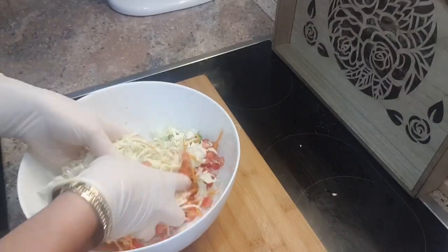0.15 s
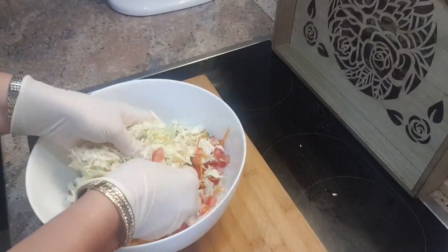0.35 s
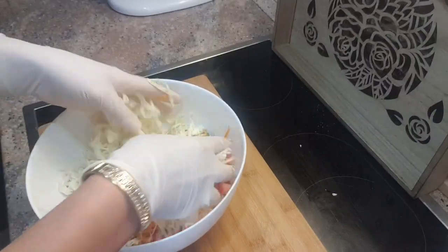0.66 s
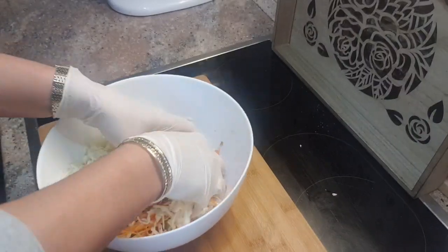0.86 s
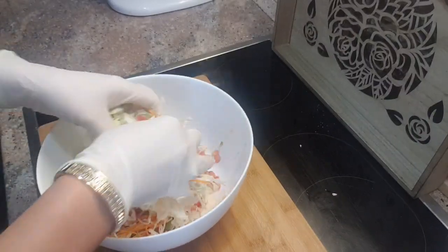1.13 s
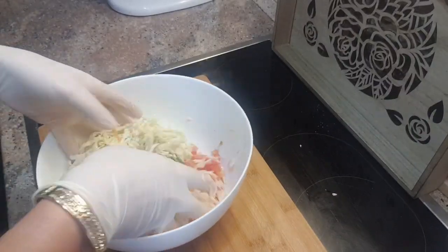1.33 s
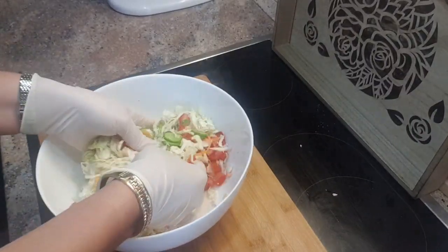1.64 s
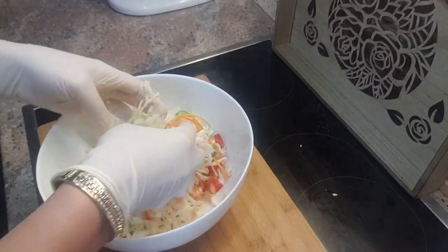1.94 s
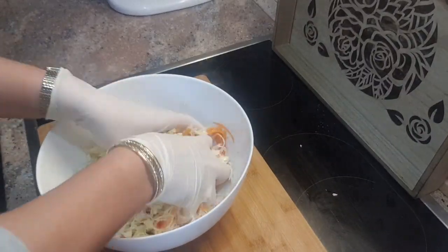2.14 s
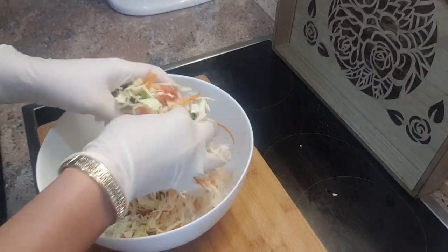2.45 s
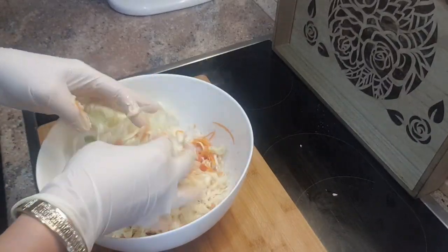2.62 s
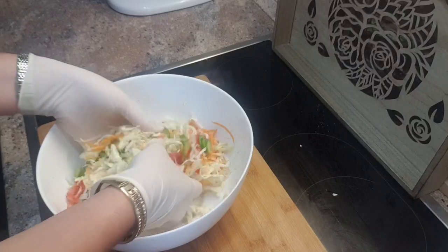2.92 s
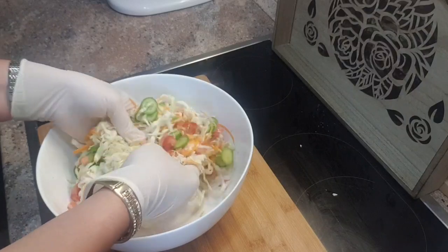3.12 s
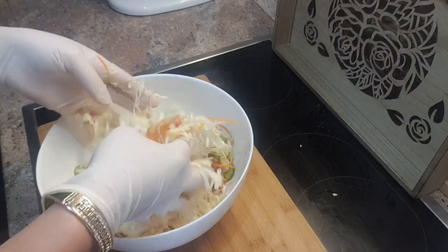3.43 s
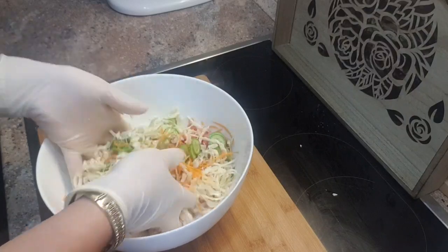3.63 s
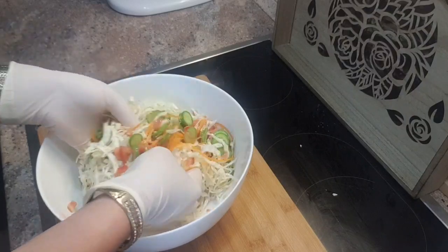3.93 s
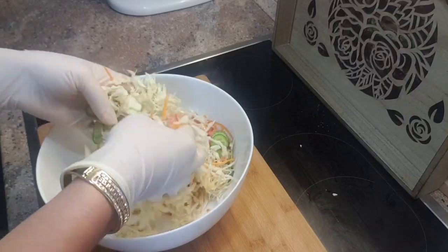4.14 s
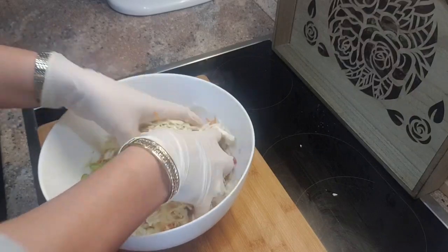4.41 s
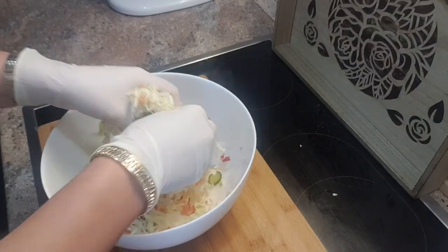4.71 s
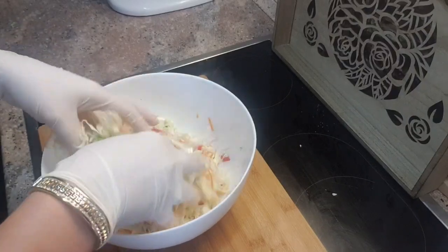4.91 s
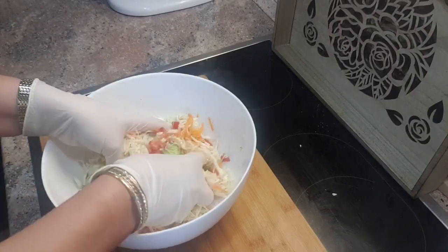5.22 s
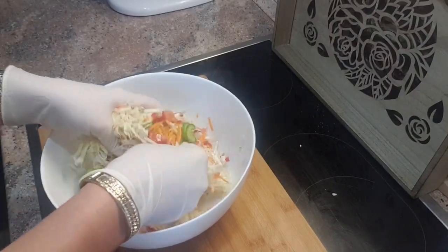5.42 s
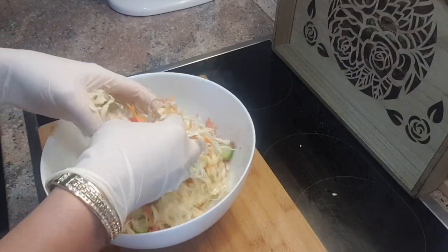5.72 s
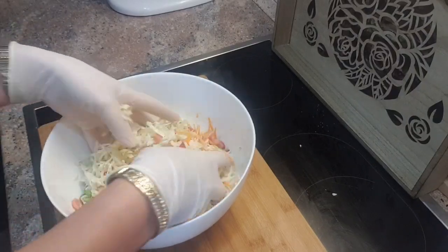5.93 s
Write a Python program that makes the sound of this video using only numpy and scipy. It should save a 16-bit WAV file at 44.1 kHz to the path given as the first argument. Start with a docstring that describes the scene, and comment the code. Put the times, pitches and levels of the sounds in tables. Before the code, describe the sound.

In a small kitchen, close to the microphone, gloved hands toss shredded cabbage in a bowl over a quiet low hum, soft air noise and a thin whirr leaning left. Scoops land near 0.2, 0.9, 1.5, 2.2, 3.0, 3.8, 4.5, 5.2 and 6.1 seconds, each swelling quickly into crisp rustle and wet squelch, then settling into trickling shreds. The bowl rings softly at 0.1 and shreds snap from 0.2 to 0.4. At 0.9 a wet slap comes with a firm board thump and stronger glove rubbing. The 1.5 scoop is the crispest and juiciest. Around 2.8 a bracelet clacks brightly on the rim, followed by crunchy snaps and a low bump near 3.1. A sharp snap marks 3.7; juice squirts around 4.5. Lighter tosses follow, then a faint clack and short rim ring near 6.0 as another scoop begins.

```python
"""Tossing shredded cabbage

Gloved hands toss shredded cabbage in a glass bowl, scoop after scoop, close by in a small kitchen.
Crowds of tiny noise ticks make the crisp rustle, wet squelch and glove rubbing; short noise bursts
make the snaps, squirts, slaps and bracelet. Fading tones make the bowl ring and its board thump.
An appliance hums underneath, made of unsteady tones and filtered noise."""
import sys
import numpy as np
from scipy import signal
from scipy.fft import rfft, irfft, next_fast_len
from scipy.io import wavfile

SR = 44100
rng = np.random.default_rng(int(sys.argv[2]) if len(sys.argv) > 2 else 0)


def dump_mix(stems):
    """Bounce the given channels to the path in sys.argv[1] as a 16-bit WAV at rate SR."""
    frames = np.atleast_2d(stems).T  # one column per channel
    limited = np.clip(frames, -1, 1)  # hard clip at full scale
    pcm = np.round(limited * 32767).astype(np.int16)
    wavfile.write(sys.argv[1], SR, pcm)


N = 267246  # length in samples

# Each scoop swells until the handful lands, is pressed, then settles; levels are before layer trims:
# (landing t/s, swell t/s, pressing t/s, settling t/s,
#  crisp rustle level/dB, wet squeeze level/dB, weight on the bowl level/dB, glove rubbing level/dB)
SCOOPS = [(.228, .095, .23, .25, -53, -57, -42.5, -63), (.903, .095, .15, .21, -59.5, -55, -41, -40.5),
          (1.533, .085, .11, .185, -51, -52.3, -41.5, -52), (2.205, .052, .143, .2, -55, -57, -46.5, -60),
          (2.954, .17, .125, .205, -56, -55.5, -46.5, -60), (3.77, .13, .09, .17, -54.5, -56.7, -46, -58.5),
          (4.538, .11, .07, .19, -59.5, -52, -40, -52.5), (5.225, .115, .15, .2, -59, -61.5, -48, -61),
          (6.055, .11, .1, .2, -62, -59, -43, -56)]
# How a layer follows a scoop; the board and the gloves have a row like these too:
# (lag t/s, rise in the swell level/dB, share of the pressing time held, settling time multiple,
#  fall per doubling of (1 + time / settling time) level/dB, idle level/dB)
CRISP_SHAPE = (.001, 23, .19, 1.25, 20, -90)
WET_SHAPE = (.008, 24, .85, 1.56, 32.5, -82)
# Fingers dig in, or loose shreds trickle down, between scoops: (t/s, crisp rustle level/dB)
STIRS = [(.02, -79), (.5, -70), (.735, -76), (1.11, -70), (1.39, -75), (2.87, -65), (3.17, -70),
         (3.26, -73), (3.63, -66), (4.84, -78)]
# Tone colour of the wet squeeze: (f/Hz, relative level/dB per Hz)
WET_COLOUR = [(200, -39), (400, -0.5), (700, -2), (1050, -4.5), (1600, -2), (2800, 1.5), (4300, 0),
              (6000, -3.5), (10000, -26), (16000, -23.5)]
# Tone colour of the crisp rustle: (f/Hz, relative level/dB per Hz)
CRISP_COLOUR = [(800, -43), (2500, -10), (4500, 0.5), (7000, 0), (10000, 0), (13000, 0), (15500, -10.5)]


def shreds():
    """Dry edges scrape and wet films part; harder handling sets more shreds slipping."""
    *_, crisp_peaks, wet_peaks, _, _ = np.transpose(SCOOPS)
    wet_db = handling(wet_peaks, WET_SHAPE)
    crisp_db = handling(crisp_peaks, CRISP_SHAPE, STIRS)
    slips = 3500 * amp(.4 * (wet_db - wet_db.max())) + 1400  # per second in each crisp band
    jerks_db = 1.03 * wobble(70, np.arange(N) / SR)
    wet_ticks = grains(slips / 2, 312, 8800, size_db=3.0, clump_db=3.5, count=7)
    wet = amp(wet_db + jerks_db - 1.46) * spread(wet_ticks, WET_COLOUR)
    crisp_ticks = grains(slips, 1700, 16900, size_db=1.5, clump_db=2.05, count=6)
    crisp = amp(crisp_db + jerks_db + 1.18) * spread(crisp_ticks, CRISP_COLOUR)
    # a sparser layer of crunchy ticks, about 120 a second, stands out of the rustle
    crunch_ticks = grains(40, 1800, 12000, size_db=1, clump_db=2.5, count=3)
    crunch = amp((wet_db + crisp_db) / 2 - 8.5) * unit(crunch_ticks)
    return wet + crisp + crunch


# Thick shreds snapping: (t/s, level/dB before the shared trim, pitch f/Hz)
SNAPS = [(.229, -39, 8000), (.303, -40, 10000), (.341, -32.5, 6960), (.389, -40.5, 5000),
         (1.384, -53, 9000), (1.571, -36, 7000), (1.713, -37, 3070), (2.193, -37.5, 9500),
         (2.318, -43.5, 2000), (2.977, -31, 8000), (3.076, -34.5, 6900), (3.234, -42, 8060),
         (3.626, -38.5, 10200), (3.743, -28.5, 8500), (4.69, -50, 4500), (4.933, -48.5, 7000)]
# Juice squirting through narrow gaps: (t/s, level/dB before the shared trim, pitch f/Hz)
SQUIRTS = [(1.66, -46, 9700), (3.051, -43.5, 4270), (3.358, -55, 8950), (4.538, -41, 3970),
           (4.586, -41.5, 1430)]
# Wet handfuls slapping down: (t/s, level/dB before the shared trim, pitch f/Hz)
SLAPS = [(.405, -48, 380), (.899, -35.5, 500), (1.555, -48, 600), (2.228, -52, 680), (2.985, -48, 600),
         (3.234, -48.5, 600), (3.743, -46, 620), (4.413, -53.5, 350)]


def snaps(life=1.0, trim_db=-8):
    """A short burst around the pitch of each snap, squirt or slap; narrow, low ones last longest."""
    out, t = np.zeros((2, N)), np.arange(SR // 8) / SR
    # the second number is the relative width of the band of noise
    for events, width in (SNAPS, .57), (SQUIRTS, .095), (SLAPS, .45):
        for s, db, pitch_hz in events:
            band = lambda hz: np.exp(-.5 * (np.log((hz + 1) / pitch_hz) / width) ** 2)
            burst = unit(filtered(rng.standard_normal((2, len(t))), band))
            t60 = life / np.sqrt(pitch_hz * width)
            add(out, s, amp(db + trim_db) * burst * fade(t, t60))
    return out


# The bracelet's links clacking against the bowl: (t/s, level/dB before the rise and fade)
CLACKS = [(2.831, -34.8), (5.957, -51)]
# Tone colour of the links: (f/Hz, relative level/dB per Hz)
LINK_COLOUR = [(400, -20), (1100, -2.5), (1500, 0.5), (2200, -2.5), (3000, -0.5), (4300, -12),
               (7300, -13.5), (12000, -28)]


def bracelet(t60=0.077):
    """Many small links land almost together: one noise burst that rises fast and fades."""
    out, t = np.zeros((2, N)), np.arange(SR // 4) / SR
    for s, db in CLACKS:
        links = filtered(rng.standard_normal((2, len(t))), lambda hz: amp(along(LINK_COLOUR, hz)))
        add(out, s, amp(db) * unit(links) * fade(t, t60) * (1 - np.exp(-t / 0.0024)))
    return out


# Touches on the rim: (t/s, relative level/dB, hardness f/Hz, tilt level/dB per octave,
# place round the rim in rad, share of the free ringing time)
TOUCHES = [(.103, -47.5, 760, -6, 1.55, .85), (2.657, -55, 2200, -4.5, 1.53, 1.4),
           (2.831, -53.5, 8000, 4.5, 1.45, .42), (2.852, -57, 4520, 7.5, 1.57, 0.4),
           (3.234, -65.5, 910, 1, 1.6, 2.1), (4.934, -68.5, 900, -9, 1.3, 2),
           (5.956, -49.5, 6030, -.8, .17, 1), (6.018, -52, 2500, -2, 1.9, 1.2)]
# Notes of the glass bowl: first its rocking note, then rim notes, each with one more wave:
# (f/Hz, relative level/dB, free time to fade by 60 dB t/s)
GLASS = [(1018, -12, .2), (751, -4, .42), (1341, 1.5, .48), (2045, -1.5, .4), (2862, 0, .36),
         (3792, -2, .34), (4822, -6, .32), (5954, -16, .22), (7197, -19, .25)]


def rim(node_share=0.48, waver_db=0.5, chatter_db=-7, chatter_t60=.06):
    """Soft touches favour the bowl's low notes, hard ones reach the high ones; hands change the fade."""
    out, t = np.zeros((2, N)), np.arange(SR // 3) / SR
    for s, db, hard_hz, tilt_db, place, free in TOUCHES:
        # a soft touch is also a slow one
        rise = 1 - np.exp(-t * hard_hz / 13)
        for waves, (hz, level, t60) in enumerate(GLASS, 1):
            # a note is weak when it is struck near one of its still points, or too softly
            shape = np.hypot(node_share, np.cos(waves * place)) / np.hypot(1, (hz / hard_hz) ** 4)
            tilt = tilt_db * np.log2(hz / GLASS[1][0])
            gain = amp(db + level + tilt) * shape * rise
            # sliding fingers make the note waver; chatter at the contact blurs its start
            ring = amp(waver_db * wobble(50, t)) * fade(t, t60 * free)
            shaking = np.array([wobble(300, t), wobble(520, t)])
            chatter = amp(chatter_db) * shaking * fade(t, chatter_t60)
            note = np.sin(2 * np.pi * hz * t + 0.47 * wobble(72, t))
            add(out, s, gain * (ring + chatter) * note)
    return out


# The bowl bumping on its board: (t/s, relative level/dB, hardness f/Hz)
BUMPS = [(.228, -35, 100), (.297, -29, 89), (.896, -27, 450), (.911, -27.5, 230), (1.379, -44.5, 120),
         (1.512, -43, 150), (2.19, -35.5, 150), (2.837, -31.5, 133), (3.071, -30.5, 78), (3.712, -42, 120),
         (4.472, -34.5, 170), (5.06, -41, 98), (5.251, -38, 130), (5.957, -35.5, 120)]
# Notes of the board and worktop, before slight detuning:
# (f/Hz, relative level/dB, time to fade by 60 dB t/s)
BOARD = [(49.6, -8, 0.34), (81.7, 2, 0.26), (103.6, -2.5, 0.28), (146, -15, 0.04), (189, -7.5, 0.18),
         (252, -7.5, .12), (311.5, -6.5, 0.18), (407, -11.5, 0.14), (678, -8.5, 0.1)]
# How the rumble follows a scoop: same columns as CRISP_SHAPE
RUMBLE_SHAPE = (.015, 15, .85, .83, 22, -59.5)
# Tone colour of the rumble: (f/Hz, relative level/dB per Hz)
RUMBLE_COLOUR = [(20, -37), (35, -14), (50, -2.5), (62, -5.5), (80, 4.5), (105, -2.5), (135, -15),
                 (250, -45)]


def board():
    """The hands push the bowl about: a dull rumble, and bumps that ring the board."""
    *_, weights, _ = np.transpose(SCOOPS)
    out = amp(handling(weights, RUMBLE_SHAPE) - 2.5) * noise(RUMBLE_COLOUR)
    t = np.arange(SR // 2) / SR
    for s, db, hard_hz in BUMPS:
        ring = np.zeros(len(t))
        for hz, level, t60 in BOARD:
            # a soft bump reaches only the lowest notes
            gain = amp(level) / np.hypot(1, (hz / hard_hz) ** 2)
            detune = rng.normal(1, 0.017)
            ring += gain * fade(t, t60) * np.sin(2 * np.pi * hz * detune * t)
        add(out, s, amp(db) * ring * (1 - np.exp(-t / 0.0046)))
    return out


# How the rubbing follows a scoop: same columns as CRISP_SHAPE
RUB_SHAPE = (.001, 42, .19, .5, 18, -70.5)
# A glove slides along the bowl between scoops: (middle t/s, half length t/s, level/dB)
SLIDES = [(.12, .12, -59.5), (.435, .043, -49.5), (.76, .065, -58), (1.45, .035, -60), (3.115, .03, -60),
          (3.92, .06, -64), (4.46, .03, -57), (5.245, .03, -56), (5.915, .065, -58.5)]
# Tone colour of the rubbing: (f/Hz, relative level/dB per Hz)
RUB_COLOUR = [(90, -25), (140, 2), (190, -2), (230, -6), (310, 0), (380, -10.5), (470, -14), (650, -16),
              (1100, -27), (3000, -59)]


def gloves():
    """Gloves rub on the bowl under the weight of each scoop, and as they slide round for the next."""
    t = np.arange(N) / SR
    *_, rub_peaks = np.transpose(SCOOPS)
    pressing = amp(handling(rub_peaks, RUB_SHAPE))
    sliding = sum(amp(db) * np.exp(-.5 * ((t - s) / half_s) ** 2) for s, half_s, db in SLIDES)
    ticks = grains(700, 78.0, 1160, size_db=2.5, clump_db=2.0, count=3)
    return np.hypot(pressing, sliding) * spread(ticks, RUB_COLOUR)


# Tones of the appliance: (f/Hz, rms level/dB before its wobble)
HUM = [(47, -73), (100, -61.5), (300, -83.5)]
# Tone colour of the air noise: (f/Hz, relative level/dB per Hz)
AIR_COLOUR = [(20, -25), (45, 7.5), (100, -1.5), (135, -6), (300, -10), (470, -19), (850, -24),
              (1400, -31.5), (1850, -33.5), (2200, -48), (3000, -29.5), (7000, -39), (11000, -32.5),
              (15500, -33)]


def appliance():
    """A slightly unsteady hum over soft air noise, with a thin uneven whirr mostly on the left."""
    t = np.arange(N) / SR
    hum = np.zeros(N)
    for hz, db in HUM:
        level = amp(db + wobble(2.74, t)) * np.sqrt(2)
        hum += level * np.sin(2 * np.pi * hz * t + 0.46 * wobble(4.02, t))
    whirr_band = lambda hz: 1 / (1 + ((hz - 2170) / 280) ** 2)
    whirr = unit(filtered(rng.standard_normal(N), whirr_band)) * amp(2.2 * wobble(7, t))
    return hum + amp(-64.5) * noise(AIR_COLOUR) + amp([[-78], [-90]]) * whirr


# How long the room sounds: (f/Hz, time to fade by 60 dB t/s)
KITCHEN = [(200, 0.35), (2000, 0.24), (12000, 0.075)]


def kitchen(x):
    """The room's short answer: fading noise, faster in the treble and unrelated in the two channels."""
    hz, t, z = signal.stft(rng.standard_normal((2, SR // 2)), SR, nperseg=256)
    fading = z * fade(t, along(KITCHEN, hz)[:, None])
    tail = signal.istft(fading, SR, nperseg=256)[1]
    return signal.fftconvolve(x, tail / np.linalg.norm(tail[0]), axes=1)[:, :N]


# Timing shared by all the small stirs: (swell t/s, pressing t/s, settling t/s)
STIR_TIMING = (.025, .2, .07)


def handling(peaks_db, shape, stirs=()):
    """Level in dB of one layer through the scoops and small stirs, over the idle movement of the fingers."""
    t = np.arange(N) / SR
    moves = [(db, scoop[:4]) for db, scoop in zip(peaks_db, SCOOPS)]
    moves += [(db, (s, *STIR_TIMING)) for s, db in stirs]
    power = sum((amp(db) * swell(t, timing, shape)) ** 2 for db, timing in moves)
    return 10 * np.log10(power + amp(shape[-1]) ** 2)


def swell(t, timing, shape, sag_db_per_s=12):
    """One movement: it rises, sags as the handful gives way, and dies ever more slowly as it settles."""
    s, swell_s, press_s, settle_s = timing
    lag_s, rise_db, held, slowness, fall_db, _ = shape
    age, hold_s = t - s - lag_s, held * press_s
    early, pressed = np.maximum(-age, 0), np.clip(age, 0, hold_s)
    late = np.maximum(age - hold_s, 0)
    settling_db = fall_db * np.log2(1 + late / (slowness * settle_s))
    return amp(-rise_db * early / swell_s - sag_db_per_s * pressed - settling_db)


def grains(slips, low_hz, high_hz, size_db, clump_db, count):
    """Ticks at `slips` a second in each band; the `count` bands each have their own pitch and clumps."""
    edges = np.geomspace(low_hz, high_hz, count + 1)
    rate = slips * np.ones(N)
    passed = np.cumsum(rate) / SR
    out = np.zeros((2, N))
    for band in zip(edges, edges[1:]):
        at = np.searchsorted(passed, rng.uniform(0, passed[-1], int(passed[-1])))
        size, left, right = rng.standard_normal((len(at), 3)).T
        clumps = wobble(60, at / SR)
        # dividing by the rate keeps the power steady as the ticks thicken
        gain = amp(size_db * np.clip(size, -2, 2) + clump_db * clumps) / np.sqrt(rate[at])
        ticks = [np.bincount(at, gain * ear, N) for ear in (left, right)]
        out += signal.sosfilt(signal.butter(2, band, "bandpass", fs=SR, output="sos"), ticks)
    return out


# How alike left and right are: (f/Hz, likeness from 0 to 1)
ALIKE = [(60, 1), (130, 0.92), (290, 0.81), (640, 0.46), (1400, 0.43), (3100, 0), (7000, 0)]


def spread(pair, spectrum):
    """Colour two unrelated signals into stereo of rms 1, with the bass near mono."""
    turn = lambda hz: np.arccos(np.clip(along(ALIKE, hz), -1, 1)) / 2
    split = lambda hz: amp(along(spectrum, hz)) * [np.cos(turn(hz)), np.sin(turn(hz))]
    mid, side = filtered(pair, split)
    return unit(np.array([mid + side, mid - side]))


def noise(spectrum):
    """Smooth stereo noise of rms 1."""
    return spread(rng.standard_normal((2, N)), spectrum)


def amp(db):
    """Decibels to gain."""
    return 10 ** (np.asarray(db) / 20)


def unit(x):
    """Scale to rms 1."""
    return x / np.sqrt(np.mean(x ** 2) + 1e-20)


def along(points, hz):
    """Read a curve of (f/Hz, value) points on a log frequency axis."""
    f, v = np.transpose(points)
    return np.interp(np.log(hz + 1), np.log(f + 1), v)


def wobble(rate, t):
    """A random curve at times t, with `rate` random points a second joined by straight lines."""
    knots = rng.standard_normal(int(t.max() * rate) + 2)
    return np.interp(t * rate, np.arange(len(knots)), knots)


def fade(t, t60):
    """Exponential decay, 60 dB down at t60 seconds."""
    return np.exp(-np.log(1000) * t / t60)


def filtered(x, response):
    """Multiply the spectrum of x by a response of frequency."""
    n = x.shape[-1]
    m = next_fast_len(n + 8192)  # spare room so the end does not wrap onto the start
    return irfft(rfft(x, m) * response(np.fft.rfftfreq(m, 1 / SR)), m)[..., :n]


def add(track, s, sound):
    """Mix a sound into a track at time s in seconds."""
    part = track[..., round(s * SR):][..., :sound.shape[-1]]
    part += sound[..., :part.shape[-1]]


# Stereo balance of the salad and bowl: (f/Hz, left minus right level/dB)
LEAN = [(100, 0), (380, -4.5), (1200, -2.5), (2400, 4), (4400, -3.5), (8000, 0.5), (15000, 2.5)]


def scene():
    """The salad and its bowl in the room, over the hum; gloves and board stay out of the room's answer."""
    near, cracks, ring = shreds() + bracelet(), snaps(), rim()
    # the sharp snaps and the rim send less into the room
    answer = kitchen(amp(-3.5) * near + amp(-6) * cracks + amp(-6.5) * ring)
    salad = near + cracks + ring + answer + gloves() + board()
    leaning = filtered(salad, lambda hz: amp(np.outer([.5, -.5], along(LEAN, hz))))
    return leaning + appliance()


def record(dry, top_hz=15750):
    """The microphone sheds the deepest bass; nothing passes above the band limit."""
    thin = signal.sosfilt(signal.butter(3, 36, "highpass", fs=SR, output="sos"), dry)
    return filtered(thin, lambda hz: hz < top_hz)


dry = scene()
out = record(dry)
dump_mix(out)
```